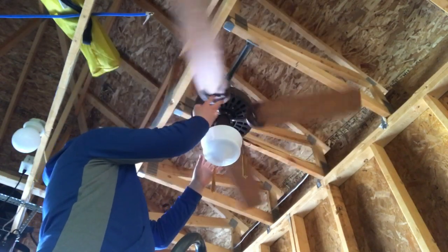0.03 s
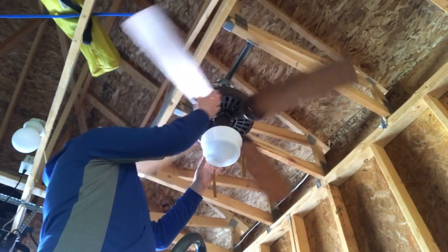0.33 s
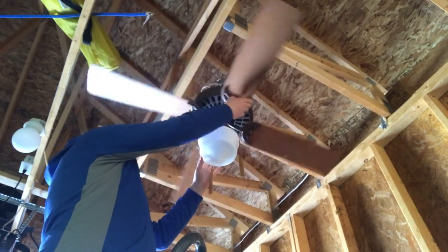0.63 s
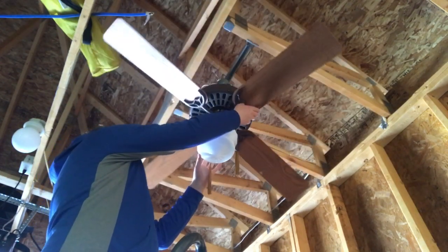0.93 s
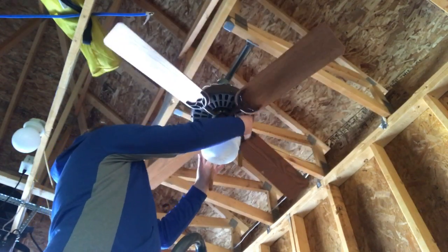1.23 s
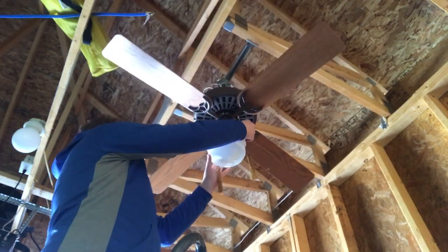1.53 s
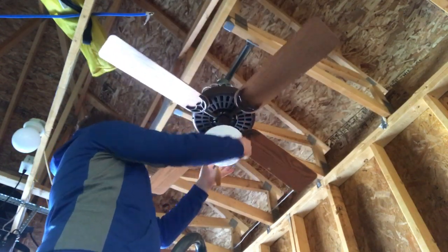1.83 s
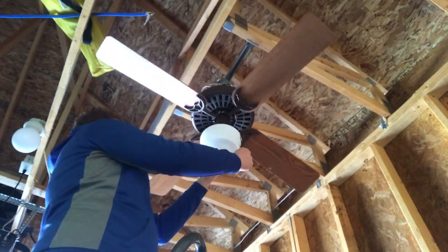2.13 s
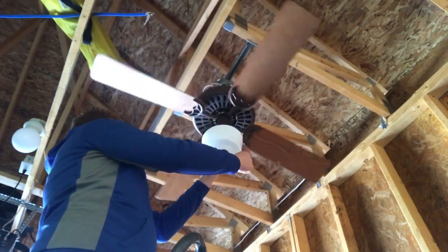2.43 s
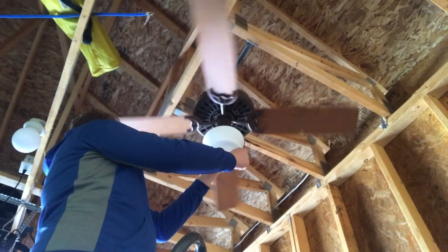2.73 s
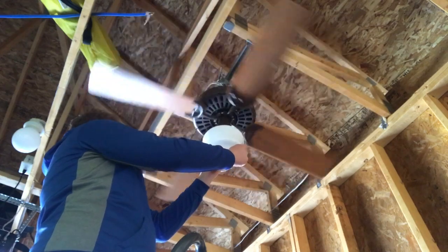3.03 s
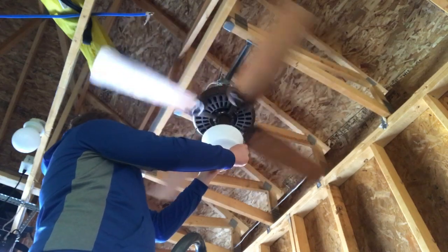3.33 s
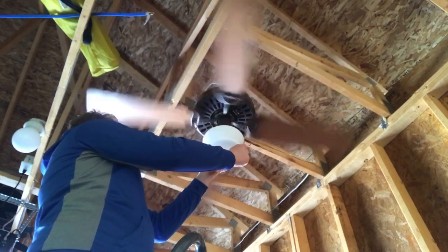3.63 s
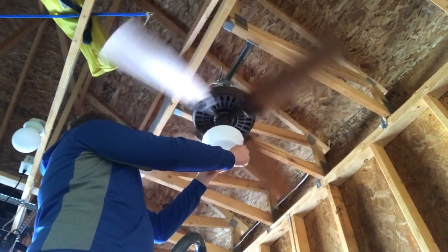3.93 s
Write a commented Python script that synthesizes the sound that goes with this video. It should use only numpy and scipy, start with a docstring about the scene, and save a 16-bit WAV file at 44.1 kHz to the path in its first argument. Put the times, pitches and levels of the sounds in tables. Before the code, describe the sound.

Metal clicks and ticks of a ceiling fan being handled, over a low rumble.

```python
"""A bare timber room, where hands work on a ceiling fan over a steady low rumble.
Air whooshes softly, hand and sleeve rub, the pull chain clinks, fingers tap and bump the casing.
A switch catches, grates and snaps over, the loose fitting knocks dully, and the metal housing
ticks as it is gripped. Each hit is a noise burst scattered by rafters and room, most with
ringing modes on top; whoosh and friction are shaped noise with a rough, wandering level."""
import sys
import numpy as np
from scipy import signal
from scipy.fft import rfft, irfft, next_fast_len
from scipy.io import wavfile
from scipy.ndimage import uniform_filter1d

SR = 44100
rng = np.random.default_rng(int(sys.argv[2]) if len(sys.argv) > 2 else 0)


def wrap_up_sound(samples):
    """Save the sound to the file named by the first command line argument, as 16-bit audio."""
    columns = np.atleast_2d(samples).T
    # keep every value between -1 and 1, then stretch to whole-number steps
    tamed = np.clip(columns, -1, 1)
    steps = np.round(tamed * 32767).astype(np.int16)
    wavfile.write(sys.argv[1], SR, steps)


N = 176400


def undb(db):
    """Decibels to gain."""
    return 10 ** (np.asarray(db) / 20)


def unit(x):
    """Scale to an rms of one."""
    return x / np.sqrt(np.mean(x ** 2))


def unit_hit(x, window_s=.01):
    """Give a hit the energy of one window at an rms of one."""
    return x * np.sqrt(window_s * SR / np.sum(x ** 2))


def colour(x, points, tilt_db=0):
    """Minimum-phase EQ through (Hz, dB) points, with an extra tilt per octave."""
    size = 2 * next_fast_len(len(x))
    octave = np.log2(np.maximum(np.fft.rfftfreq(size, 1 / SR), 1))
    hz, db = np.array(points).T
    knots = np.log2(hz)
    slope = tilt_db * (np.clip(octave, knots[0], knots[-1]) - knots.mean())
    cepstrum = irfft(np.log(undb(np.interp(octave, knots, db) + slope)))
    cepstrum[1:size // 2] *= 2
    cepstrum[size // 2 + 1:] = 0
    return irfft(rfft(x, size) * np.exp(rfft(cepstrum)))[:len(x)]


def wander(rate_hz):
    """Smooth random drift with an rms of one."""
    hold = int(SR / rate_hz)
    steps = np.repeat(rng.standard_normal(N // hold + 1), hold)
    return unit(uniform_filter1d(uniform_filter1d(steps, hold), hold)[:N])


def fader(curve):
    """Gain riding through (s, dB) points."""
    return undb(np.interp(np.arange(N) / SR, *np.array(curve).T))


def resonant_noise(resonances):
    """Noise ringing in (Hz, width, dB) resonances."""
    freqs = np.fft.rfftfreq(N, 1 / SR)
    out = np.zeros(N)
    for hz, width, db in resonances:
        spectrum = rfft(rng.standard_normal(N)) / (1 + (2 * (freqs - hz) / width) ** 2)
        out += undb(db) * unit(irfft(spectrum, N))
    return out


def texture(curve, noise, rough_db=2.5):
    """Noise follows a level curve with a fast, uneven flutter."""
    return fader(curve) * undb(rough_db * wander(70)) * unit(noise)


def add(out, start, sound):
    """Mix a sound in at its time."""
    i = int(start * SR)
    out[i:i + len(sound)] += sound[:N - i]


def crack(eq, tilt_db=0, room_db=0, grain=None):
    """A brief contact burst, scattered first by nearby rafters and then, duller, by the room."""
    burst_s, first_wall_s = .0021, .0021
    early_db, early_t60_s = 4, .075
    late_db, late_t60_s, late_top_hz = .5, .23, 6900
    t = np.arange(SR // 2) / SR
    burst, early, late = rng.standard_normal((3, len(t))) if grain is None else grain
    arrival = np.clip(t / first_wall_s - .5, 0, 1)
    late = signal.sosfilt(signal.butter(1, late_top_hz, fs=SR, output="sos"), late)
    room = (undb(early_db) * unit_hit(early * arrival * undb(-60 * t / early_t60_s))
            + undb(late_db) * unit_hit(late * arrival * undb(-60 * t / late_t60_s)))
    direct = unit_hit(burst * np.sqrt(t) * np.exp(-2 * t / burst_s))
    return unit_hit(colour(direct + undb(room_db) * room, eq, tilt_db))


def ring(modes, tilt_db=0, scatter_db=3.5, detune=.001, rise_s=.0014):
    """Decaying modes, excited a little differently by every hit; upward tilt favours the high ones."""
    t = np.arange(SR // 2) / SR
    sound = 0
    for (hz, db, t60), (strength, shift, phase) in zip(modes, rng.standard_normal((len(modes), 3))):
        wave = np.sin(2 * np.pi * (hz * (1 + detune * shift) * t + phase))
        gain = undb(db + tilt_db * np.log2(hz / modes[0][0]) + scatter_db * strength)
        sound = sound + gain * wave * undb(-60 * t / t60)
    return unit_hit(sound * (1 - np.exp(-t / rise_s)))


# room tone EQ (frequency [Hz], gain [dB])
AIR_EQ = [(20, -22), (30, -14.5), (40, 11), (52, 13.5), (70, 10), (105, 4.5), (128, 5), (160, -6.5),
          (210, -10), (260, -6), (360, -7.5), (460, -14.5), (700, -14), (950, -11), (1350, -12.5),
          (2000, -22.5), (3000, -32.5), (5000, -42), (6500, -37), (8500, -39), (10500, -45), (13000, -39.5),
          (15500, -40.5)]
# low hums (frequency [Hz], width [Hz], level [dB])
LOW_HUMS = [(58.4, 3.5, -56), (88.96, 2.85, -54)]
# ride on bass and hums (time [s], gain [dB])
BASS_RIDE = [(0, -1), (.65, 2.5), (1.2, -0.5), (1.5, -3.5), (1.9, -1.5), (2.25, -1.5), (2.55, -2),
             (2.85, 1.5), (3.25, -1), (4, 0.5)]


def rumble(air_db=-51, flicker_db=1, crossover_hz=134):
    """A bed of room tone whose bass, with two wavering hums, swells and sinks."""
    gain = undb(air_db + flicker_db * wander(8.78))
    air = gain * unit(colour(rng.standard_normal(N + SR), AIR_EQ)[SR:])
    bass = signal.sosfiltfilt(signal.butter(4, crossover_hz, fs=SR, output="sos"), air, padtype="even")
    return air - bass + fader(BASS_RIDE) * (bass + resonant_noise(LOW_HUMS))


# rides for the midrange whoosh and later rub, sliding hiss and sleeve rustle (time [s], level [dB])
WHOOSH_RUB_RIDE = [(0, -76), (.4, -65.5), (.8, -69), (1.25, -70), (1.5, -63.5), (1.85, -65), (2.25, -69.5),
                   (2.31, -60), (2.42, -65.5), (2.52, -56.5), (2.7, -67), (3.0, -66), (3.4, -66.5),
                   (4, -66.5)]
SLIDE_RIDE = [(0, -67), (.3, -82), (1.05, -76), (1.17, -76), (1.3, -78), (1.5, -73.5), (1.72, -74),
              (2.1, -77.5), (2.35, -71.5), (2.63, -72.5), (2.8, -72.5), (3.0, -78.5), (3.2, -71),
              (3.43, -77), (3.7, -71), (4, -75)]
RUSTLE_RIDE = [(0, -81), (.2, -98), (.5, -86), (.66, -76), (.85, -91), (1.1, -98), (4, -98)]
# their EQs (frequency [Hz], gain [dB])
WHOOSH_RUB_EQ = [(300, -8), (600, -4), (950, 3.5), (1500, -0.5), (2400, -9.5), (3500, -12.5), (8000, -36)]
SLIDE_EQ = [(1500, -7.5), (2900, -1.5), (3600, -1.5), (4250, -3), (4900, -7), (6400, -7.5), (8500, -17.5),
            (15000, -19)]
RUSTLE_EQ = [(3000, -26), (7500, 0), (10500, -10), (13500, 2), (15500, 4)]


def whoosh_and_handling():
    """A soft whoosh of air swells off the nudged blades, then the hand rubs; a sleeve rustles on top."""
    whoosh_rub = texture(WHOOSH_RUB_RIDE, colour(rng.standard_normal(N), WHOOSH_RUB_EQ))
    slide = texture(SLIDE_RIDE, colour(rng.standard_normal(N), SLIDE_EQ))
    rustle = texture(RUSTLE_RIDE, colour(rng.standard_normal(N), RUSTLE_EQ), rough_db=2.2)
    return whoosh_rub + slide + rustle


# chain scrape ride (time [s], level [dB])
SCRAPE_RIDE = [(0, -74), (.1, -84.5), (1.08, -87), (1.16, -80), (1.3, -88), (1.44, -73), (1.53, -78),
               (1.6, -78), (1.68, -83), (1.79, -77), (1.92, -85), (2.03, -85), (4, -88)]
# chain resonances (frequency [Hz], width [Hz], gain [dB])
SCRAPE_BANDS = [(5300, 400, -2.5), (5990, 810, 1), (6770, 400, -4)]


def chain_scrape():
    """The pull chain drags with a fine, bright scrape."""
    return texture(SCRAPE_RIDE, resonant_noise(SCRAPE_BANDS))


# singing housing ride (time [s], level [dB])
SING_RIDE = [(0, -88), (.4, -83), (1.05, -87.5), (1.17, -79), (1.3, -86), (2.25, -87), (2.35, -76),
             (2.58, -76), (2.63, -66), (2.67, -74), (2.71, -67.5), (2.8, -77.5), (3.0, -76), (3.14, -77),
             (3.18, -68), (3.25, -74.5), (3.43, -79), (4, -73)]
# rubbed housing resonances (frequency [Hz], width [Hz], gain [dB])
SING_BANDS = [(3750, 170, -2.5), (4100, 83, -4), (4270, 66, -2), (4460, 45, -7.5)]


def housing_sing():
    """The metal housing sings thinly under the sliding hand."""
    return texture(SING_RIDE, resonant_noise(SING_BANDS), rough_db=1)


# chain hits (time [s], level [dB], tilt [dB/octave])
CLINK_CUES = [(.135, -69, 6), (1.417, -64, -2), (1.424, -66, 4), (1.583, -65, -4), (1.7793, -62.5, 0),
              (1.8201, -73, -1), (1.875, -58.5, 0.5), (1.9518, -70, 2), (1.966, -69.5, 0),
              (2.2422, -60.5, -1), (2.2654, -64, -2), (2.276, -61, 2), (2.2833, -55, -1), (2.291, -50, 5),
              (2.302, -58, 8), (2.452, -66, -4), (2.458, -63, 3), (2.47, -73, -1), (2.483, -52.5, -0.5)]
# clink EQ (frequency [Hz], gain [dB])
CLINK_EQ = [(1000, -14), (3000, -5), (4500, -2.5), (5800, 1), (7500, -2), (10000, -7.5), (12500, -1),
            (15000, 1.5)]


def chain_clinks():
    """The pull chain strikes in tiny, crisp clinks."""
    out = np.zeros(N)
    for start, db, tilt_db in CLINK_CUES:
        add(out, start, undb(db) * crack(CLINK_EQ, tilt_db, room_db=-1))
    return out


# fingertip hits (time [s], level [dB], tilt [dB/octave])
TAP_CUES = [(0.284, -69.5, 3), (1.3297, -70, -6), (1.3783, -62, -8), (1.4403, -58, 3), (1.454, -56.5, -2),
            (1.5531, -57.5, -4), (1.6174, -61.5, -5), (1.765, -67, -6)]
# tap attack EQ (frequency [Hz], gain [dB])
TAP_EQ = [(500, -29), (1500, -14), (2150, -0.5), (2550, -4), (3050, 3.5), (3800, -9), (4800, -6.5),
          (6200, -10), (9000, -16), (15000, -39)]
# casing ring (frequency [Hz], gain [dB], T60 [s])
CASING_RING = [(2084, -1, 0.085), (2900, 0, 0.062), (3320, -7, .07), (4640, -10, 0.16), (4930, -11, .11),
               (6420, -15, 0.14)]


def finger_taps():
    """Fingertips tap the casing, leaving a short damped ring."""
    out = np.zeros(N)
    for start, db, tilt_db in TAP_CUES:
        attack = crack(TAP_EQ, tilt_db, room_db=-10)
        add(out, start, undb(db) * (attack + undb(-4) * ring(CASING_RING, tilt_db)))
    return out


# soft hand hits (time [s], level [dB])
BUMP_CUES = [(0.285, -51.5), (1.849, -57), (1.872, -55)]
# thud EQ (frequency [Hz], gain [dB])
BUMP_EQ = [(100, -38), (200, -5), (255, 18.5), (345, -7.5), (600, -14), (3000, -46)]
# motor case ring (frequency [Hz], gain [dB], T60 [s])
MOTOR_CASE_RING = [(252, 0, .16), (348, -10, .1)]


def hand_bumps():
    """The hand bumps the motor case and wakes its low modes."""
    out = np.zeros(N)
    for start, db in BUMP_CUES:
        thud = crack(BUMP_EQ, room_db=6)
        add(out, start, undb(db) * (thud + undb(2.5) * ring(MOTOR_CASE_RING)))
    return out


# lever grate ride (time [s], level [dB])
GRATE_RIDE = [(2.29, -86), (2.315, -55), (2.36, -59.5), (2.41, -60), (2.48, -59.5), (2.51, -72)]
# lever resonances (frequency [Hz], width [Hz], gain [dB])
GRATE_BANDS = [(618, 78, -0.5), (886, 60, -0.5), (1270, 24, -4.5), (1780, 140, -2), (2143, 110, -4.5),
               (2602, 57, -6), (4530, 260, -16)]


def lever_grate():
    """The switch lever grates coarsely in its slot."""
    return texture(GRATE_RIDE, resonant_noise(GRATE_BANDS), rough_db=5.5)


# catch, snap and rebounds (time [s], level [dB], tilt [dB/octave], ring [dB], room send [dB])
SNAP_CUES = [(2.2940, -46, -2.5, -5.5, -3.5), (2.4984, -35, 2, -1, -5), (2.5095, -45, -9, 0, -6),
             (2.517, -49, -1, -4.5, 3)]
# snap attack EQ (frequency [Hz], gain [dB])
SNAP_EQ = [(120, -60), (400, -27), (700, -19), (970, 10.5), (1200, -10), (1600, -6), (2000, 3.5),
           (2300, -11), (2900, -1), (3750, -0.5), (4040, 0), (4300, 7), (4600, 1), (4950, -2.5), (6200, 0),
           (7350, 0), (8600, -15.5), (14000, -16)]
# switch ring (frequency [Hz], gain [dB], T60 [s])
SWITCH_RING = [(899, -3, 0.07), (962, 9.5, 0.12), (1371, -1, 0.13), (1780, -9, .13), (1977, -3.5, 0.093),
               (2750, -13.5, 0.19), (2815, -9.5, 0.2), (3070, -12, 0.18), (3483, -4, 0.15), (3700, -6, .14),
               (4240, 3, 0.13), (4320, -10, 0.2), (4700, -17, 0.14), (5403, -4.5, 0.098), (5840, -14, .14),
               (6180, -10, 0.15), (6130, -8, 0.13), (6922, -11, 0.15), (6840, -14, 0.16), (7300, -19, 0.13)]


def switch_snaps():
    """The switch catches lightly, then snaps over hard, with a hollow rebound and a bright one."""
    out = np.zeros(N)
    for start, db, tilt_db, ring_db, room_db in SNAP_CUES:
        attack = crack(SNAP_EQ, tilt_db, room_db)
        tail = ring(SWITCH_RING, min(tilt_db, 0), scatter_db=2.5)
        add(out, start, undb(db) * (attack + undb(ring_db) * tail))
    return out


# fitting hits (time [s], level [dB], tilt [dB/octave], ring [dB])
KNOCK_CUES = [(2.817, -52, 2.5, 4), (2.826, -50, -0.5, 8.5), (2.8412, -50.5, 0.5, 9),
              (2.862, -46.5, 0, -0.5)]
# knock attack EQ (frequency [Hz], gain [dB])
KNOCK_EQ = [(120, -18), (260, 7), (450, -8), (590, 2), (740, -9), (980, -3), (1300, -17), (1800, -17),
            (3500, -20), (8000, -35.5), (15000, -52)]
# fitting ring (frequency [Hz], gain [dB], T60 [s])
FITTING_RING = [(252.3, -7, 0.41), (337, -10.5, 0.47), (391, -6, .25), (561.7, 0.5, 0.16), (625, 5, 0.051),
                (792, -8, .22), (981, 2, 0.082), (1380, -18, 0.12)]


def fitting_knocks():
    """The loose fitting judders in a short run of hollow knocks."""
    out = np.zeros(N)
    for start, db, tilt_db, ring_db in KNOCK_CUES:
        attack = crack(KNOCK_EQ, tilt_db, room_db=9)
        add(out, start, undb(db) * (attack + undb(ring_db) * ring(FITTING_RING, scatter_db=1.4)))
    return out


# ticks under the grip (time [s], level [dB], tilt [dB/octave], ring [dB])
TICK_CUES = [(2.8668, -46.5, -3.5, -5.5), (2.873, -53.5, 2, 1), (2.888, -49, -4.5, -5.5),
             (3.154, -71, 0, 8), (3.172, -66, -5, 6), (3.331, -67, -1, -4), (3.3377, -54, -5.5, 2),
             (3.359, -71, 8, -7), (3.4858, -46.5, -4, -3), (3.494, -62, -16, 0), (3.6235, -58, -3, 2),
             (3.6728, -68, -7, 5.5), (3.732, -71, 4, 0), (3.744, -49.5, -4.5, 0), (3.854, -54, -2, -0.5),
             (3.8642, -42, 2.5, -4), (3.869, -52, 1, -9), (3.889, -51, 6, -4), (3.961, -49.5, -5.5, -3),
             (3.9711, -35.5, 3.5, -5)]
# tick attack EQ (frequency [Hz], gain [dB])
TICK_EQ = [(200, -31), (500, -21.5), (1150, -6), (1700, -19), (2400, -13.5), (3300, -10), (4000, 2),
           (4600, 3.5), (5020, -4), (5300, 1), (5800, 6), (6100, -3), (6500, -2), (7200, -5.5),
           (8600, -14.5), (11000, -15.5), (15000, -16.5)]
# housing ring (frequency [Hz], gain [dB], T60 [s])
HOUSING_RING = [(956, -12, .2), (1340, -9.5, 0.29), (1895, 3, 0.15), (2146, -1.5, 0.17), (2600, -6.5, 0.31),
                (3090, -11, 0.23), (3350, -14, 0.24), (3660, -8, 0.19), (3880, -5, .17), (3910, 1, 0.19),
                (4230, -8, .17), (4360, -3, 0.17), (4410, -0.5, 0.12), (4813, -11, 0.097),
                (5200, -13, 0.23), (5670, -13, 0.15), (5760, -9, 0.14), (6250, -22, 0.12),
                (6500, -11, 0.13), (11550, -17, 0.19)]


def housing_ticks(shared=.6):
    """Sharp ticks ring the thin metal housing; coming from one spot, they share part of their scatter."""
    out = np.zeros(N)
    path = rng.standard_normal((3, SR // 2))
    for start, db, tilt_db, ring_db in TICK_CUES:
        grain = np.sqrt(shared) * path + np.sqrt(1 - shared) * rng.standard_normal(path.shape)
        attack = crack(TICK_EQ, tilt_db, room_db=-3, grain=grain)
        add(out, start, undb(db) * (attack + undb(ring_db) * ring(HOUSING_RING, tilt_db)))
    return out


def scene():
    """All sources at one microphone below the fan."""
    bed = rumble() + whoosh_and_handling() + chain_scrape() + housing_sing()
    mechanics = lever_grate() + switch_snaps() + housing_ticks() + fitting_knocks()
    touches = finger_taps() + chain_clinks() + hand_bumps()
    return (bed + mechanics + touches)[None]


def record(dry, top_hz=15800):
    """A steep low-pass trims the very top."""
    return signal.sosfilt(signal.ellip(10, .2, 70, top_hz, fs=SR, output="sos"), dry)


dry = scene()
out = record(dry)
wrap_up_sound(out)
```